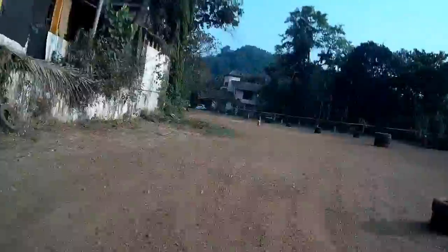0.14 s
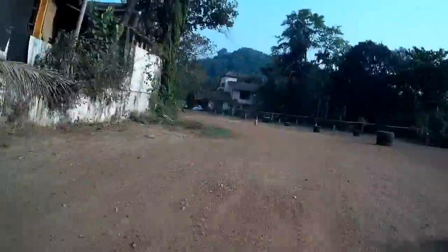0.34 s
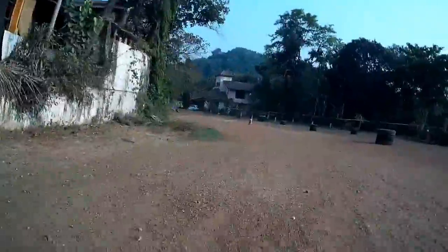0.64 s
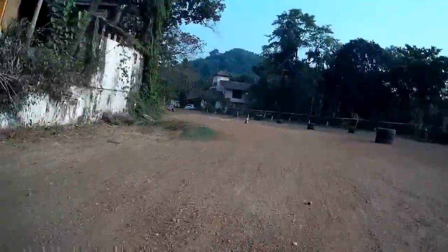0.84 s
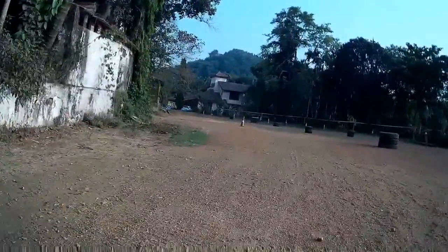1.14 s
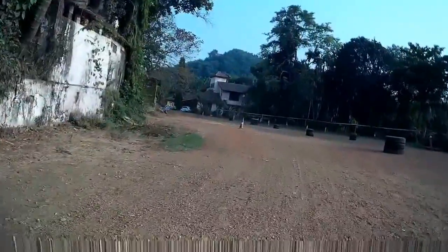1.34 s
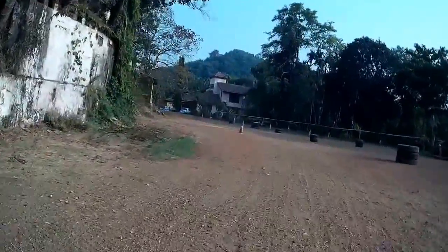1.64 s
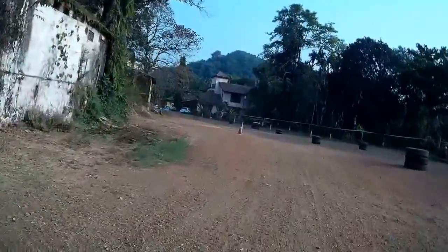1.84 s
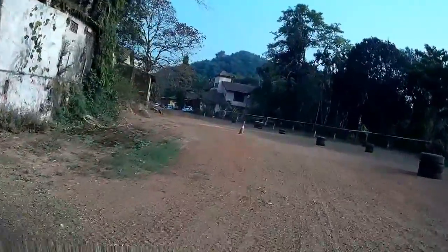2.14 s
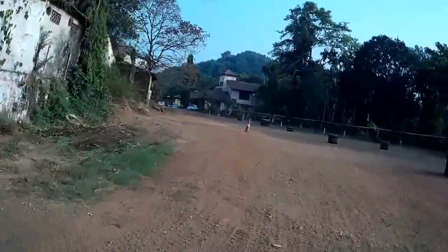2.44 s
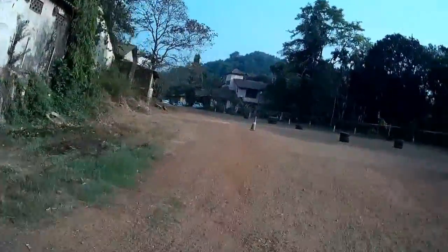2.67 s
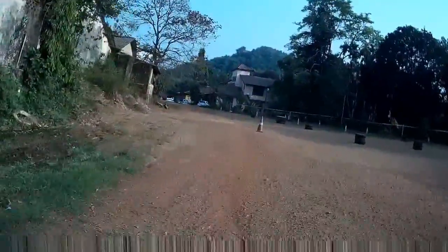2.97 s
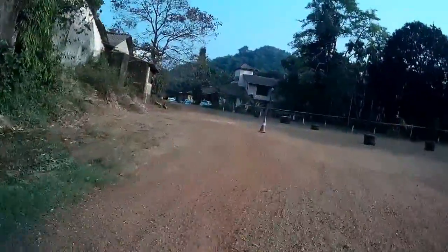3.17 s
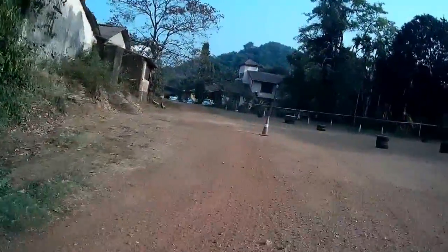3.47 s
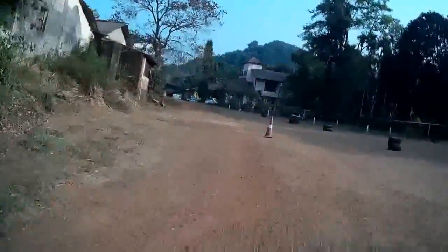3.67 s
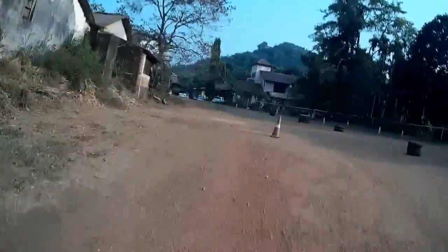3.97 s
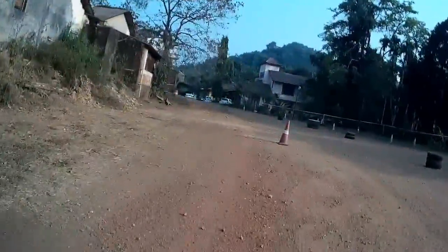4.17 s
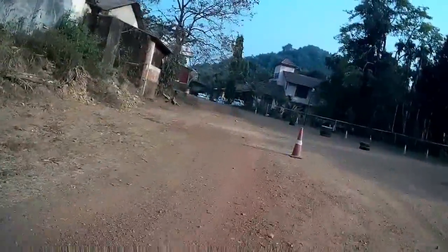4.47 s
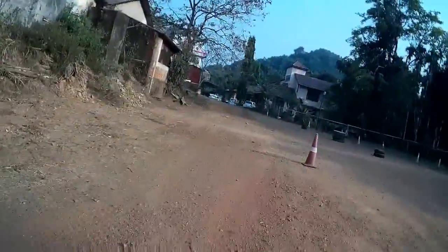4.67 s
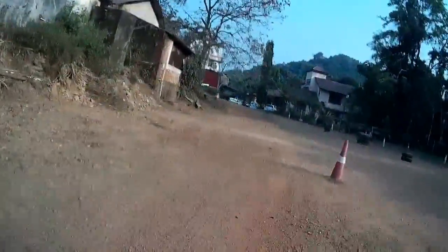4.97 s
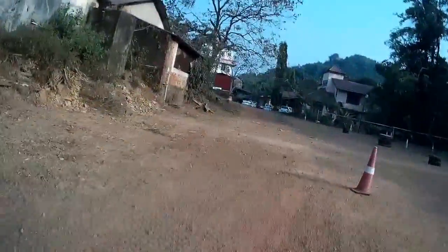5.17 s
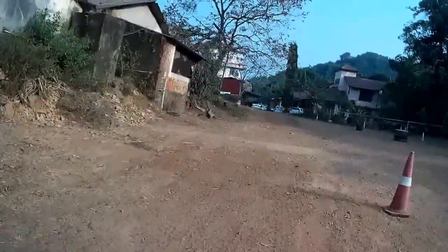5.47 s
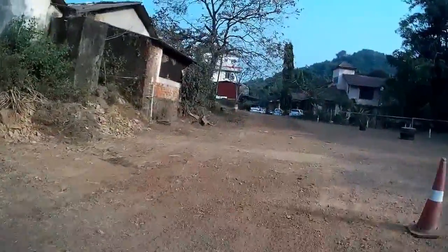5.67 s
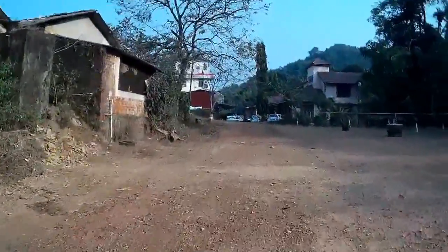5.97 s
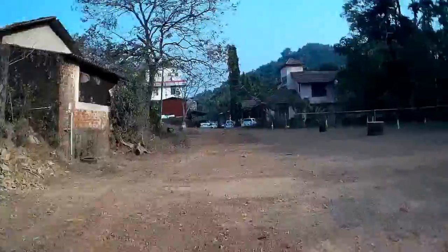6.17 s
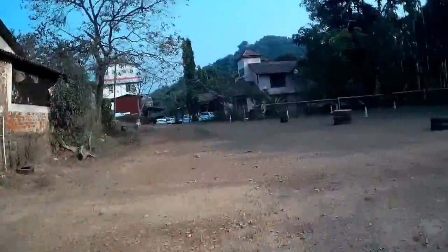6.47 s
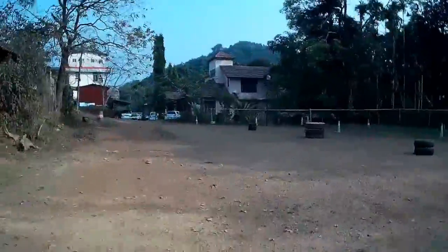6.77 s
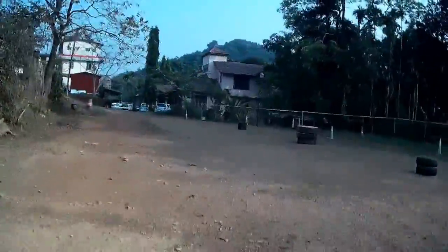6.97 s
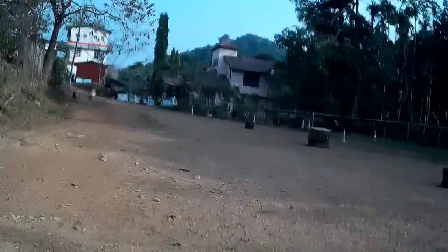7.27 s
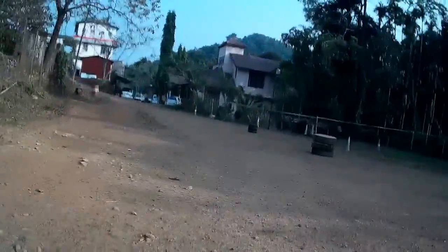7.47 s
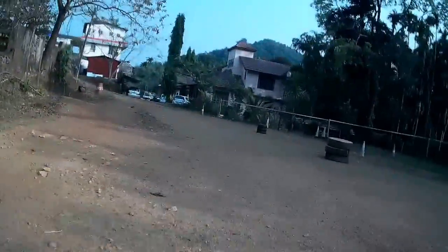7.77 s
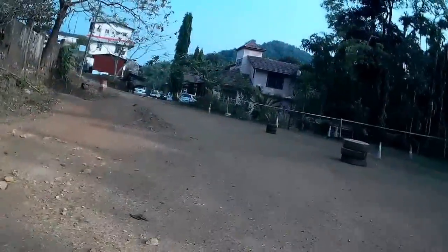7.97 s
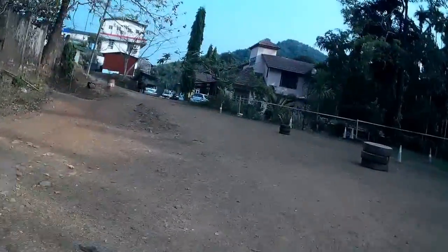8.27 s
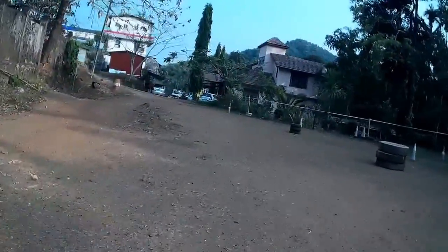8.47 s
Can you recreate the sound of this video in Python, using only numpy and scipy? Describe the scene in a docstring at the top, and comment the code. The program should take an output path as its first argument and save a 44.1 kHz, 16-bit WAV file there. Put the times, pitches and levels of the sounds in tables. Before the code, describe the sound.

A small moped rides along a bumpy dirt track, heard from a microphone shut inside a loose plastic housing. The housing clacks and thuds several times a second in an uneven pattern, while loose parts chatter and the harder jolts land as deep, slightly overloaded thumps. Behind this, wind rumble swells with the shaking, and a wavering engine hum and tyre noise come through muffled.

```python
"""A camera swings and knocks in a loose plastic housing on a small moped riding a bumpy dirt track.
Each swing pumps the shut-in air and ends with a strike on the shell. The shell clacks, the mount
thuds, and loose parts chatter in the gaps, more so where the track is rough. Behind it all,
engine hum, tyre noise and wind rumble come through the housing muffled."""
import sys
import numpy as np
from scipy import signal
from scipy.fft import rfft, irfft
from scipy.io import wavfile
from scipy.ndimage import uniform_filter1d

SR = 44100
rng = np.random.default_rng(int(sys.argv[2]) if len(sys.argv) > 2 else 0)


def put_to_file(sound):
    """Save the sound as 16-bit audio at rate SR, in the file named by the first command-line argument."""
    columns = np.atleast_2d(sound).T  # one column per channel
    safe = np.clip(columns, -1, 1)
    whole_steps = np.round(safe * 32767)
    wavfile.write(sys.argv[1], SR, whole_steps.astype(np.int16))


N = 379701

# swings of the camera, each squeezing the air before it strikes: strike_s, squeeze_s, size_db
CAMERA_SWINGS = [(0.1231, .0107, -7), (0.2127, .0092, -8), (0.5834, .0123, -3), (1.4215, .0092, -4),
                 (2.4256, .008, -3.5), (2.5717, .011, -4), (2.6243, .0132, -4), (2.9512, .0112, -1),
                 (3.0055, .015, -2), (3.5019, .0106, -6.5), (3.5915, .0104, -6), (3.6481, .0142, -3),
                 (3.8445, .0126, -4), (3.9055, .0177, -3), (3.961, .0131, -1.5), (4.0105, .0112, -4),
                 (4.1071, .0107, -8), (4.5392, .011, -6), (4.8135, .007, -3), (4.8634, .012, -3),
                 (4.9073, .0065, -7), (4.9567, .013, -1), (5.0038, .0091, -2), (5.161, .0139, -3),
                 (6.275, .009, -4), (6.7043, .0162, -5), (6.8714, .0155, -6), (6.9572, .0062, -8),
                 (7.0081, .0117, -2.5), (7.0608, .0125, -8), (7.2455, .0125, -2), (7.2979, .0151, -2),
                 (7.3894, .0104, -8), (7.4481, .0171, -1.5), (7.5294, .0104, -7), (7.58, .0096, -7),
                 (7.7085, .0147, -6), (7.8055, .0105, -3)]
# knocks on the shell: start_s, clack_db, treble_db (the bright click, played 9 dB above this)
SHELL_KNOCKS = [(0.0538, -11, -21.5), (0.1062, -4, -21), (0.166, -26, -43), (0.192, -10, -32),
                (0.2561, -10, -34), (0.394, -10.5, -32), (0.47, -12, -35), (0.5028, 1, -16),
                (0.5198, -6, -23), (0.5338, -9, -25), (0.5674, -3.5, -35), (0.6534, -24, -50),
                (0.6792, -9, -18.5), (0.6977, -6, -38), (0.7128, -6, -25), (0.7265, -5, -23),
                (0.7768, -10, -34), (0.84, -1, -19.5), (0.8954, -1, -26), (0.9779, 1, -14.5),
                (1.0312, -5.5, -21.5), (1.044, -4, -22.5), (1.071, -15, -38), (1.1288, -17, -56),
                (1.16, -7.5, -53), (1.1957, -14.5, -29), (1.2346, -10.5, -41), (1.2947, -7, -19.5),
                (1.3056, -6.5, -20), (1.3399, 2, -14.5), (1.3616, -7, -15), (1.407, -8.5, -27),
                (1.5364, -6, -12.5), (1.6601, -7.5, -26), (1.6706, -5, -24), (1.711, -9.5, -21),
                (1.7717, -2, -20), (1.7874, -6.5, -39), (1.7983, -5.5, -19.5), (1.921, -14, -43),
                (1.9407, -3, -16), (1.9474, -6, -27), (1.9815, -17.5, -37), (2.2362, -7.5, -12.5),
                (2.3492, -10.5, -25), (2.364, -4, -34), (2.5514, -5.5, -25), (2.6813, -8, -27.5),
                (2.7127, -16, -19.5), (2.7706, -12.5, -39), (2.803, -13, -30), (2.8245, -3, -12.5),
                (2.8559, -17, -45), (2.885, -12.5, -37), (2.9874, -5.5, -7), (3.0184, -19, -14.5),
                (3.054, -10, -26), (3.1166, -8.5, -31), (3.2474, 0.5, -12), (3.266, -11, -29),
                (3.2746, -13.5, -22), (3.3163, 1.5, -24), (3.3488, -16, -22), (3.3563, -6, -37),
                (3.395, -9, -31), (3.469, -13, -23), (3.5384, -17, -51), (3.573, -0.5, -19.5),
                (3.6304, -4, -5), (3.7083, -15.5, -35), (3.7881, -6, -23), (3.7968, -11.5, -15),
                (3.8604, -10, -14), (3.9175, -11.5, -4), (3.995, -17, -24), (4.087, -5, -20),
                (4.277, -8, -23), (4.301, -22, -33), (4.3842, -10.5, -35), (4.4138, -13, -44),
                (4.4401, -3, -34), (4.484, -3, -18.5), (4.586, -16.5, -28), (4.7579, -4.5, -18.5),
                (4.8253, -28, -6.5), (4.9356, -5, -12.5), (4.9916, -1, -15), (5.024, -2.5, -17.5),
                (5.0714, -8, -27), (5.108, -23, -40), (5.2701, -13, -35), (5.3045, -14, -24.5),
                (5.3137, -12.5, -19.5), (5.3526, -1, -24), (5.3634, -7.5, -21), (5.4235, -15, -18),
                (5.4997, -9.5, -37), (5.5125, -5.5, -20.5), (5.5307, -9.5, -21), (5.5441, -1.5, -17.5),
                (5.6386, -3, -10.5), (5.654, -6, -17), (5.7947, -15, -30), (5.824, -22, -31),
                (5.8494, -12, -14), (5.892, -2.5, -13.5), (5.9942, 1, -9), (6.048, -7.5, -16.5),
                (6.1205, -6.5, -8), (6.2063, -13, -24), (6.2184, -2, -16), (6.255, -22, -21),
                (6.331, -14, -29.5), (6.3783, -8, -19), (6.4639, -9.5, -21), (6.5975, -11, -23.5),
                (6.6758, -4, -33), (6.6816, 0.5, -31), (6.7233, -5, -16.5), (6.759, -10.5, -17),
                (6.797, -10.5, -25.5), (6.8536, -8, -23), (6.9186, -10.5, -22.5), (6.9666, -3.5, -4.5),
                (7.1126, -12.5, -28.5), (7.1736, -10, -23), (7.195, -4.5, -12.5), (7.228, -7, -11.5),
                (7.2752, -15, -17), (7.3318, -6, -13.5), (7.3731, -4, -17.5), (7.427, -14, -18),
                (7.5045, -4.5, -19), (7.5418, -9, -11), (7.566, -7.5, -23), (7.615, -19, -23),
                (7.6826, -16, -29), (7.7506, -9, -15.5), (7.7797, -10.5, -29), (7.854, -2.5, -24),
                (7.889, -22, -26), (8.0534, -15, -28), (8.0739, -13, -36), (8.106, -10.5, -18),
                (8.1262, -8.5, -29), (8.1513, -8.5, -26), (8.3251, 0, -17), (8.3475, -11.5, -20),
                (8.401, -14.5, -29), (8.5025, -14, -26.5), (8.5764, -10.5, -26)]
# A mode is a tone that a part rings at when hit; fade_s is the time it takes to fall by 60 dB.
# low modes of the shell: pitch_hz, relative_db, fade_s
SHELL_LOW_MODES = [(782, -8.5, 0.0089), (955, -11, 0.012), (1450, -9.5, 0.011), (2117, -4.5, 0.0098),
                   (2273, -1.5, 0.0044), (2993, -13, 0.012)]
# high modes of the shell: pitch_hz, relative_db, fade_s
SHELL_HIGH_MODES = [(4383, -6, 0.031), (5150, 30, 0.001), (5345, -4.5, 0.035), (7210, 25, 0.0008),
                    (7370, -16, 0.019), (10520, 11, 0.00078)]
# modes of the mount: pitch_hz, relative_db, fade_s
MOUNT_MODES = [(342.5, 21, 0.02), (461, -5, 0.028)]


def gain_of(db):
    """Turns decibels into a number to multiply a sound by."""
    return 10 ** (np.asarray(db) / 20)


def evened(x):
    """Scales a signal so that its average strength (rms) is 1."""
    return x / np.sqrt(np.mean(x ** 2) + 1e-20)


def add(mix, start_s, sound):
    """Mixes a sound in at start_s."""
    part = mix[max(round(start_s * SR), 0):][:len(sound)]
    part += sound[:len(part)]


def drift(samples):
    """A random wander of strength 1, smooth over this many samples."""
    return evened(uniform_filter1d(uniform_filter1d(rng.standard_normal(N), samples), samples))


def ring(modes, detune=0, spread_db=0, samples=1800, rise=1):
    """One clean blow rings the modes; where it lands shifts their pitch and strength."""
    t = np.arange(samples) / SR
    pitch_hz, level_db, fade_s = np.transpose(modes)[:, :, None]
    level_shift, pitch_shift = rng.standard_normal((2, len(modes), 1))
    fade = gain_of(level_db + spread_db * level_shift - 60 * t / fade_s)
    onset = 1 - np.exp(-rise * pitch_hz * t)
    tones = np.sin(2 * np.pi * pitch_hz * (1 + detune * pitch_shift) * t)
    return (fade * onset * tones).sum(0)


def crack(modes, fade_s, spread_db, detune=0.015):
    """A hard contact and a quickly dying burst of noise ring the modes. The peak is 1."""
    burst = rng.standard_normal(900) * gain_of(-60 * np.arange(900) / SR / fade_s)
    burst[0] = 2.5  # the first contact
    out = signal.fftconvolve(burst, ring(modes, detune, spread_db))
    return out / abs(out).max()


def shower(blow, per_s, spread_db, kinds=10):
    """A random rain of small blows, most of them faint."""
    sizes = gain_of(spread_db * np.minimum(rng.exponential(1, N), 3))
    hits = sizes * (rng.random(N) < per_s / SR)
    kind = rng.integers(0, kinds, N)
    blows = sum(signal.oaconvolve(hits * (kind == k), blow())[:N] for k in range(kinds))
    return evened(blows / np.sqrt(per_s))  # crowding alone does not make it louder


def shaking(knock_db=0):
    """How hard the loose parts shake, in dB about the average: after each knock, around each swing."""
    settle_s, spread_s, lead_s = 0.015, 0.035, 0.008
    swing_db, calm_db = -4, -13
    t = np.arange(0, N / SR, 1 / 400)
    start_s, clack_db, _ = np.transpose(SHELL_KNOCKS)[:, :, None]
    knocked = gain_of(clack_db + knock_db) * (t > start_s) * np.exp(-abs(t - start_s) / settle_s)
    strike_s, _, size_db = np.transpose(CAMERA_SWINGS)[:, :, None]
    swung = gain_of(size_db + swing_db) * np.exp(-((t - strike_s + lead_s) / spread_s) ** 2)
    power_db = 10 * np.log10((knocked ** 2).sum(0) + (swung ** 2).sum(0) + gain_of(2 * calm_db))
    return np.interp(np.arange(N) / SR, t, power_db - power_db.mean())


def wind_rumble():
    """Wind and road come through the housing as lumpy, deep noise that swells with the shaking."""
    # strength of the rumble from bass to treble: pitch_hz, relative_db
    rumble_shape = [(6, -26), (24, 1.5), (65, -10), (200, -17.5), (600, -29.5), (1200, -62.5),
                    (5000, -63.5), (16000, -68.5)]
    pitch_hz, relative_db = np.transpose(rumble_shape)
    all_hz = np.fft.rfftfreq(N, 1 / SR)
    colour = gain_of(np.interp(np.log(all_hz + 1), np.log(pitch_hz), relative_db))
    lumps_db = 2.5 * drift(900)
    noise = evened(irfft(rfft(rng.standard_normal(N)) * colour, N))
    return gain_of(-20 + 0.86 * shaking() + lumps_db) * noise


def engine_hum():
    """The engine's firing sends a wavering hum through the frame, and the mount drones along."""
    # loudness of the hum along the ride: time_s, level_db
    hum_levels = [(0, -34.5), (2.3, -21.5), (3.2, -33), (7.6, -25.5), (8.3, -20.5)]
    firing_hz, drone_hz, drone_fade_s = 94.9, 349.8, 0.038
    cycles = np.cumsum(firing_hz * (1 + 0.2 * drift(400))) / SR
    noise = rng.standard_normal(N)
    drone = evened(signal.oaconvolve(noise, ring([(drone_hz, 0, drone_fade_s)]))[:N])
    hum_db = np.interp(np.arange(N) / SR, *np.transpose(hum_levels)) + 5.7 * drift(600)
    drone_db = -40 + 6.7 * drift(2000)
    return gain_of(hum_db) * np.sin(2 * np.pi * cycles) + gain_of(drone_db) * drone


def tyre_rush():
    """Tyre and engine noise, dulled by the wall of the shell, with a thin whine on top."""
    # loudness of the noise along the ride: time_s, level_db
    rush_levels = [(0.0, -39), (1.5, -46), (2.2, -38), (3.2, -47.5), (4.35, -45), (5.6, -44.5), (7.4, -50),
                   (8.61, -37.5)]
    # narrow bands that whine: pitch_hz, relative_db, fade_s
    whine_modes = [(3240, 6, 0.028), (4500, 28.5, 0.05)]
    noise, whine_noise = rng.standard_normal((2, N))
    shell = evened(signal.oaconvolve(noise, ring(SHELL_LOW_MODES, samples=300))[:N])
    wall = signal.butter(5, [750, 2700], "bandpass", fs=SR, output="sos")
    muffled = evened(signal.sosfilt(wall, shell + 2.5 * evened(noise)))
    whine = evened(signal.oaconvolve(whine_noise, ring(whine_modes, samples=200))[:N])
    rush_db = np.interp(np.arange(N) / SR, *np.transpose(rush_levels)) + 4.5 * drift(200)
    whine_db = -15 + 0.84 * shaking() + 4 * drift(1500)
    return gain_of(rush_db) * (muffled + gain_of(whine_db) * whine)


def grit():
    """Tiny contacts come so close together that they merge into a crunch where the track is rough."""
    def tick():
        return crack(SHELL_LOW_MODES, 0.0065, 4) + 0.4 * crack(SHELL_HIGH_MODES, 0.008, 3)
    crunch = shower(tick, per_s=350, spread_db=5, kinds=6)
    return gain_of(-42.5 + 2.4 * shaking(knock_db=-6) + 5 * drift(500)) * crunch


def chatter():
    """Loose parts tick faster, louder and brighter on the bumps; the mount never stops shaking softly."""
    def tick():
        return crack(SHELL_LOW_MODES, 0.0085, 3.5) + 0.35 * crack(SHELL_HIGH_MODES, 0.01, 3)
    rough_db = 1.96 * shaking()
    ticks = shower(tick, per_s=70 * gain_of(rough_db), spread_db=4)
    treble = signal.sosfilt(signal.butter(2, 3230, "highpass", fs=SR, output="sos"), ticks)
    ticks = ticks + (gain_of(0.95 * rough_db - 7.5) - 1) * treble
    shakes = shower(lambda: crack(MOUNT_MODES, 0.04, 4, detune=0.04), per_s=90, spread_db=4.5)
    return gain_of(-37.5 + rough_db) * ticks + gain_of(-27.5 + 0.5 * rough_db) * shakes


def mount_thud(peak_db):
    """One hollow blow on the mount; its wave starts downwards."""
    out = ring(MOUNT_MODES, detune=0.07, spread_db=2.3, rise=4)
    return -gain_of(peak_db) * out / abs(out).max()


def knocks():
    """Each knock, and the strike that ends each swing, makes the shell clack and the mount thud."""
    # extra thuds of the mount on the harder bumps: start_s, peak_db
    bump_thuds = [(0.395, -9), (0.7271, -11), (.896, 0), (1.0435, -4.5), (1.661, -5.5), (1.712, -1.5),
                  (1.948, -7.5), (2.3643, 0.5), (2.8245, -8.5), (3.7873, -21), (3.7972, -4), (4.4389, 3.5),
                  (4.4865, -2), (5.0239, 0), (5.364, -8), (5.6385, -5), (5.6499, -0.5), (6.207, -4),
                  (6.38, -2), (6.917, -3), (7.1948, -3), (7.8557, -3), (8.1514, -4), (8.3235, -2.5),
                  (8.576, -7.5)]
    blows = [(start_s, clack_db, treble_db + 9, clack_db - 9.5)
             for start_s, clack_db, treble_db in SHELL_KNOCKS]
    for strike_s, _, size_db in CAMERA_SWINGS:
        force_db = 1.62 * size_db  # a bigger swing strikes much harder
        blows.append((strike_s, force_db - 3, force_db - 6.5, force_db + 0.5))
    out = np.zeros(N)
    for start_s, clack_db, treble_db, thud_db in blows:
        add(out, start_s, gain_of(clack_db) * crack(SHELL_LOW_MODES, 0.017, 2))
        add(out, start_s, gain_of(treble_db) * crack(SHELL_HIGH_MODES, 0.01, 2, detune=0.012))
        add(out, start_s, mount_thud(thud_db))
    for start_s, peak_db in bump_thuds:
        add(out, start_s, mount_thud(peak_db))
    return out


def camera_swings():
    """The air in the housing is sucked out, squeezed until the camera strikes its stop, then let go."""
    out = np.zeros(N)
    for strike_s, squeeze_s, size_db in CAMERA_SWINGS:
        u = np.arange(-2, 3, 1 / (squeeze_s * SR))  # time in squeeze lengths; the strike is at 0
        suck = -np.cos(2.6 * (u + 1)) * np.exp(-((u + 1) / 0.55) ** 2)
        squeeze = 1 - 2 * abs(u) ** 1.9
        release = np.cos(2.2 * u) * np.exp(-abs(u) / 0.4)
        pressure = np.select([u < -1, u < 0], [suck, squeeze], release)
        add(out, strike_s - 2 * squeeze_s, gain_of(size_db) * pressure)
    return out


def scene():
    """Everything reaches the one microphone through the housing."""
    mix = camera_swings() + knocks() + chatter() + grit() + tyre_rush() + wind_rumble() + engine_hum()
    return mix[None]


def record(dry):
    """The hardest jolts overload the input and are clipped; then the highest treble is cut off."""
    cutoff_hz = 16200
    clipped = np.clip(dry, -1, 1)
    lowpass = signal.firwin(511, cutoff_hz, window=("kaiser", 9), fs=SR)
    return signal.oaconvolve(clipped, lowpass[None], "same")


dry = scene()
out = record(dry)
put_to_file(out)
```